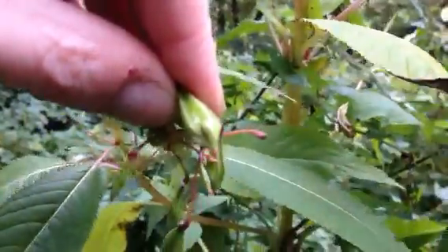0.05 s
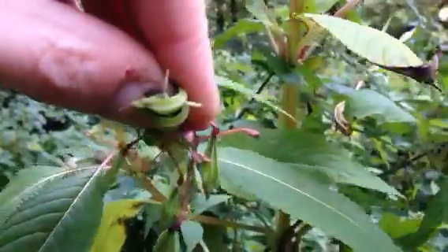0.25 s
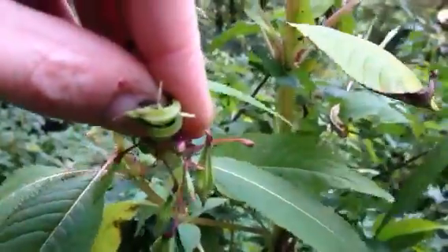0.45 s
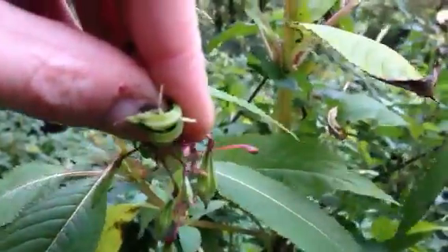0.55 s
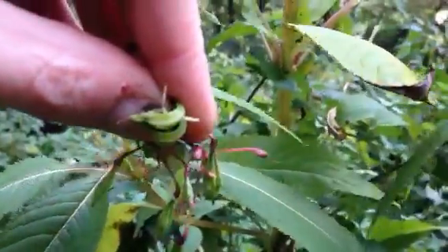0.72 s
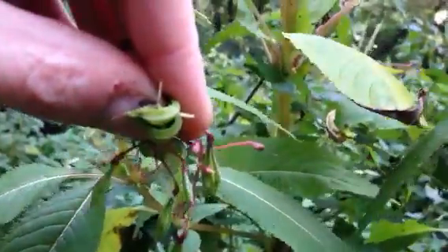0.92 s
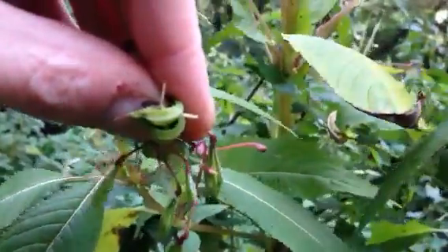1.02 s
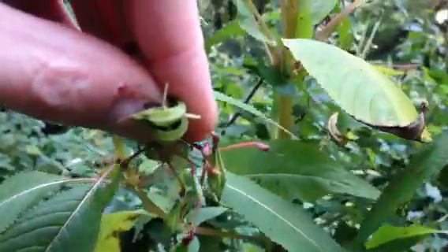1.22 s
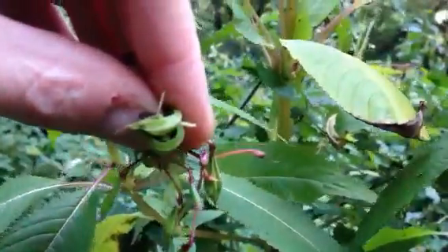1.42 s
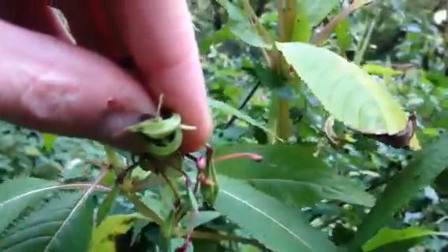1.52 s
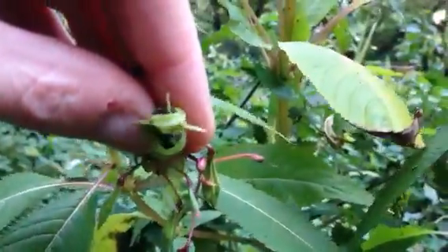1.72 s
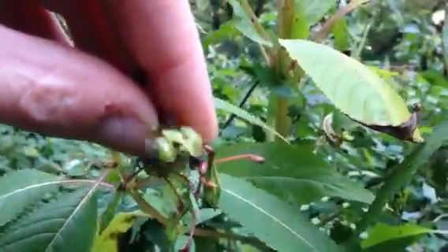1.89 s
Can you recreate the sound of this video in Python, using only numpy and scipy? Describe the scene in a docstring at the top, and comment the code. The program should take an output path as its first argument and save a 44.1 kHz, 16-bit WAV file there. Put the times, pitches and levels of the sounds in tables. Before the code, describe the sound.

A seed pod bursts between fingers with one sharp, snapping pop close to the microphone. A few faint leaf ticks follow over a quiet outdoor hiss, soft wind bumps and a slight distant rumble.

```python
"""A seed pod bursting

A ripe green pod bursts between finger and thumb, close to the microphone, among leaves outdoors.
Its walls spring apart with a damped pop, the seam snaps, and the valves coil and slap together.
Faint leaf ticks follow, over a quiet hiss, a growing distant rumble and soft low wind bumps."""
import sys
import numpy as np
from scipy import signal
from scipy.fft import rfft, irfft
from scipy.io import wavfile

SR = 44100
rng = np.random.default_rng(int(sys.argv[2]) if len(sys.argv) > 2 else 0)


def pcm_store(signal):
    """Save signal as 16-bit PCM."""
    levels = np.round(np.clip(np.atleast_2d(signal), -1, 1) * 32767)
    wavfile.write(sys.argv[1], SR, levels.astype(np.int16).T)


N = 85995
BURST_S = .24045


def undb(db):
    """Decibels to gain."""
    return 10 ** (np.asarray(db) / 20)


def noise(gain):
    """Noise of rms 1 whose spectrum follows gain(Hz)."""
    f = np.maximum(np.arange(N // 2 + 1) * SR / N, 1)
    x = irfft(rfft(rng.standard_normal(N)) * gain(f), N)
    return x / np.std(x)


def coloured(points):
    """Noise with a spectrum of (Hz, dB) points, falling away below the lowest."""
    hz, db = np.array(points, float).T
    return noise(lambda f: undb(np.interp(np.log(f), np.log(hz), db)) * np.minimum(f / hz[0], 1) ** 2)


def since(start):
    """Milliseconds since a moment, zero before it."""
    return np.maximum(np.arange(N) / SR - start, 0) * 1000


def burst(ms, rise, decay):
    """Envelope with a quick rise and an exponential fall."""
    ms = np.maximum(ms, 0)
    return np.minimum(ms / rise, 1) * np.exp(-np.maximum(ms - rise, 0) / decay)


def ring(ms, modes):
    """Modal superposition: heavily damped sinusoids swell and die away."""
    ms = np.maximum(ms, 0)
    seconds = ms / 1000
    out = np.zeros(N)
    for hz, db, swell in modes:
        envelope = (ms / swell * np.exp(1 - ms / swell)) ** 2
        out += undb(db) * envelope * np.sin(2 * np.pi * hz * seconds)
    return out


# Spectrum of the hiss (frequency [Hz], relative density [dB])
HISS_SPECTRUM = [(30, -8.5), (65, -1), (120, -8.5), (220, -7.5), (400, -8), (650, -13.5), (1150, -17.5),
                 (1900, -15.5), (2750, -20.5), (4300, -17), (6000, -20.5), (8500, -23), (15000, -23.5)]

def air_hiss(level_db=-64.5, waver_db=.35):
    """Amplitude modulation: the level of broadband outdoor noise wavers slightly."""
    waver = noise(lambda f: np.exp(-f / 10))
    return undb(level_db + waver_db * waver) * coloured(HISS_SPECTRUM)


# Spectrum of the rumble (frequency [Hz], relative density [dB])
RUMBLE_SPECTRUM = [(40, -27), (90, -8.5), (130, -5.5), (175, 1), (245, -3.5), (330, -14.5), (500, -31),
                   (1000, -48)]
# Growth of the rumble (time [s], level [dB])
RUMBLE_SWELL = [(0, -86.5), (.75, -72), (1.0, -67.5), (1.15, -63), (1.39, -63.5), (1.435, -58.5),
                (1.48, -63), (1.63, -57), (1.72, -57), (1.8, -61), (1.87, -58), (1.91, -60.5), (1.94, -53)]

def distant_rumble():
    """Amplitude envelope: low-frequency noise swells unevenly."""
    level_db = np.interp(np.arange(N) / SR, *np.array(RUMBLE_SWELL).T)
    return undb(level_db) * coloured(RUMBLE_SPECTRUM)


# Wind bumps on the microphone (time [s], level [dB], half-width [s])
WIND_BUMPS = [(0.014, -68, 0.018), (.22, -67.5, 0.065), (0.302, -67.5, 0.012), (0.583, -70.5, 0.034),
              (1.448, -63.5, 0.022), (1.75, -62, 0.022)]
# Spectrum of the bumps (frequency [Hz], relative density [dB])
BUMP_SPECTRUM = [(45, -10), (75, 14), (140, -10.5), (300, -30), (1000, -59.5)]

def wind_bumps():
    """Pressure fluctuation: wind on the microphone gives soft low bumps."""
    t = np.arange(N) / SR
    envelope = sum(undb(db) * np.exp(-((t - at) / width) ** 2) for at, db, width in WIND_BUMPS)
    return envelope * coloured(BUMP_SPECTRUM)


# Modes of the pod wall (frequency [Hz], peak level [dB], time to peak [ms])
WALL_RESONANCES = [(1106, -28, 0.38), (2140, -22, 0.74), (3850, -10.5, 0.5), (5880, -25.5, 0.65),
                   (8040, -26, .3), (10500, -28.5, .22)]

def wall_pop():
    """Damped vibration: the walls spring apart and their modes die within milliseconds."""
    return ring(since(BURST_S), WALL_RESONANCES)


# Slaps of the valves (delay after the burst [ms], level [dB], decay time [ms])
VALVE_SLAPS = [(.5, -34.5, 2.8), (2.6, -35, 0.91), (5.9, -35, 1.9), (6.9, -28.5, .5)]
# Spectrum of the slaps (frequency [Hz], relative density [dB])
SLAP_SPECTRUM = [(300, -28.5), (700, -20.5), (1500, -1.5), (2400, 1.5), (4000, 6.5), (5500, -3),
                 (7200, 0.5), (8300, -6), (11000, 2), (12000, -20.5), (13500, -2.5), (15000, -2.5)]

def valve_slaps(rise_ms=.28):
    """Impact noise: the wet valves coil and collide, each contact a broadband pulse."""
    ms = since(BURST_S)
    envelope = sum(undb(db) * burst(ms - delay, rise_ms, decay) for delay, db, decay in VALVE_SLAPS)
    return envelope * coloured(SLAP_SPECTRUM)


# Modes of the seam (frequency [Hz], peak level [dB], time to peak [ms])
SEAM_RESONANCES = [(13320, -20, 0.35), (14550, -24, 0.51)]

def seam_snap(delay_ms=.69):
    """Impulsive excitation: the snapping seam rings briefly in its high modes."""
    return ring(since(BURST_S) - delay_ms, SEAM_RESONANCES)


# Spectrum of the scattered pop (frequency [Hz], relative density [dB])
SCATTER_SPECTRUM = [(300, -9), (1500, -0.5), (4000, 5), (8000, -7.5), (15000, -12.5)]

def foliage_scatter(level_db=-57.5, rise_ms=4, t60_s=.17):
    """Diffuse scattering: reflections from many leaves merge into decaying noise."""
    decay_ms = 1000 * t60_s / np.log(1000)
    return undb(level_db) * burst(since(BURST_S), rise_ms, decay_ms) * coloured(SCATTER_SPECTRUM)


# Touches on leaves (time [s], level [dB], decay time [ms], centre frequency [Hz])
LEAF_TOUCHES = [(0.577, -60.5, 4, 1800), (0.603, -57.5, 3, 1190), (0.634, -66.5, 11, 1400),
                (.707, -63.5, 7.2, 1500), (1.551, -58, 6.7, 2400), (1.556, -65.5, 18, 4770),
                (1.795, -67.5, 15, 5230)]

def leaf_ticks(rise_ms=1.35, q=1.7):
    """Low-Q resonance: each light touch on a leaf is a puff of noise in one broad band."""
    out = np.zeros(N)
    for start, db, decay, hz in LEAF_TOUCHES:
        band = noise(lambda f: 1 / (1 + (q * (f / hz - hz / f)) ** 2) ** .5)
        out += undb(db) * burst(since(start), rise_ms, decay) * band
    return out


def scene():
    """Superposition: the pod and its surroundings add at one microphone."""
    pod = wall_pop() + valve_slaps() + seam_snap()
    leaves = foliage_scatter() + leaf_ticks()
    background = air_hiss() + distant_rumble() + wind_bumps()
    return (pod + leaves + background)[None]


def record(dry):
    """Band limiting: a low-pass filter removes the highest treble."""
    lowpass = signal.firwin(255, cutoff=15300, fs=SR)
    return signal.fftconvolve(dry, lowpass[None], mode="same")


dry = scene()
out = record(dry)
pcm_store(out)
```